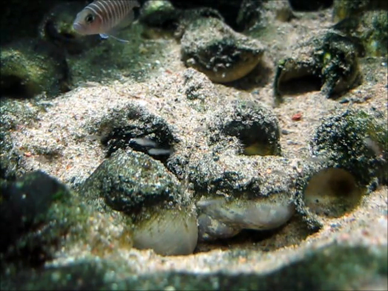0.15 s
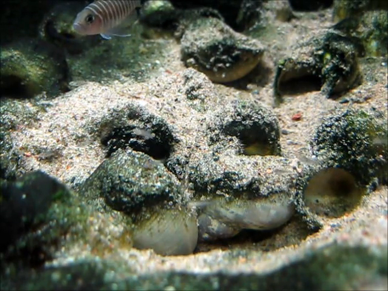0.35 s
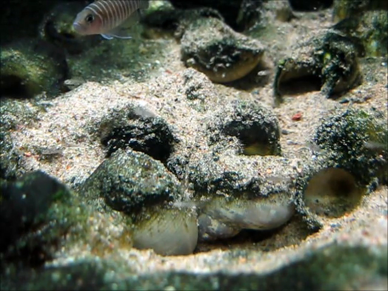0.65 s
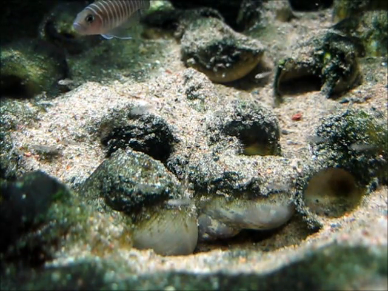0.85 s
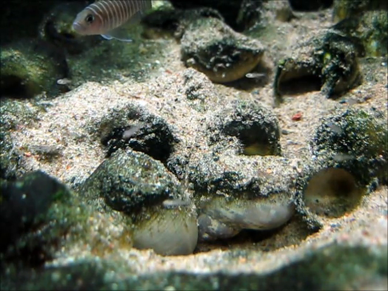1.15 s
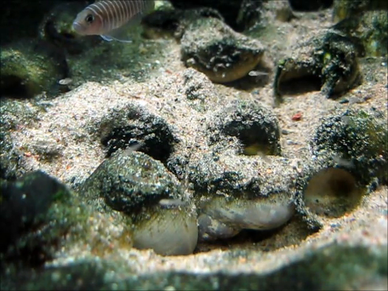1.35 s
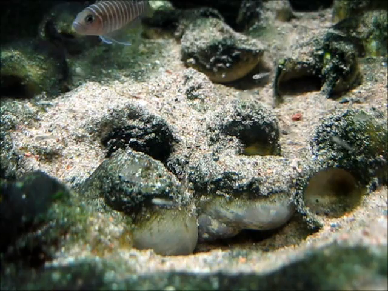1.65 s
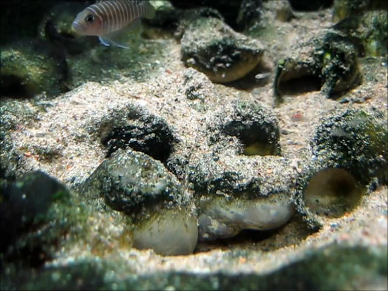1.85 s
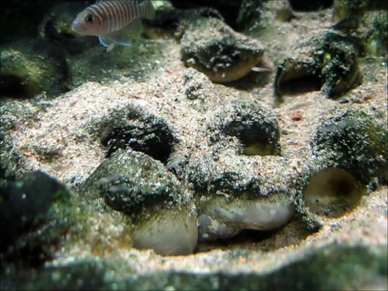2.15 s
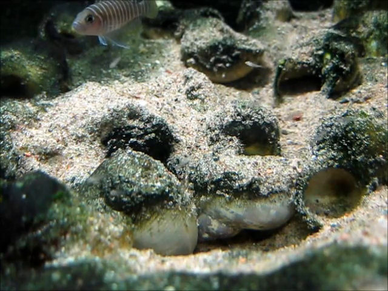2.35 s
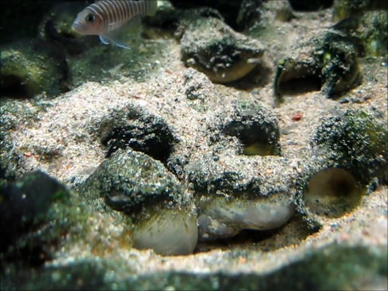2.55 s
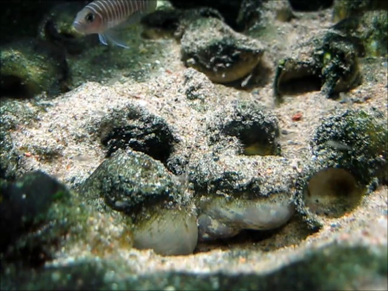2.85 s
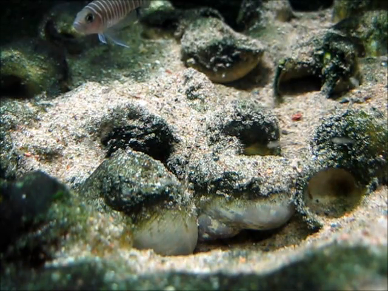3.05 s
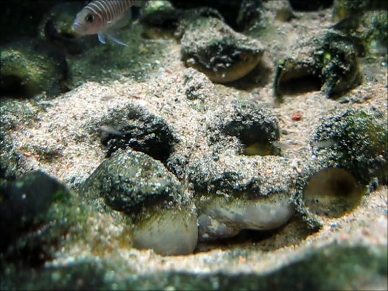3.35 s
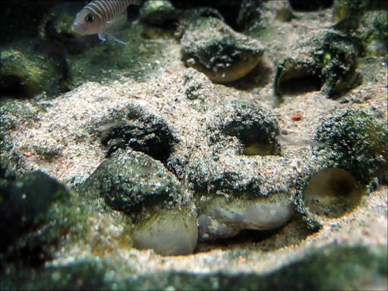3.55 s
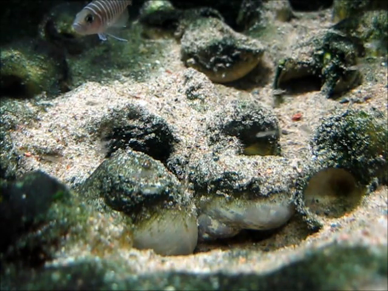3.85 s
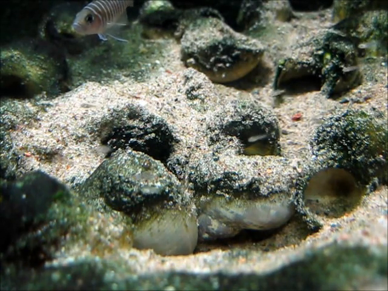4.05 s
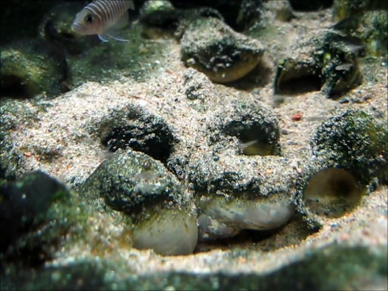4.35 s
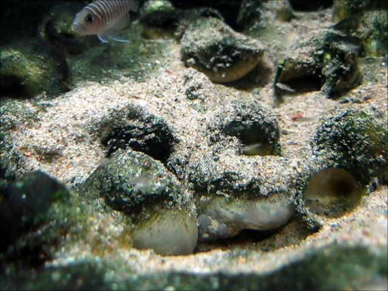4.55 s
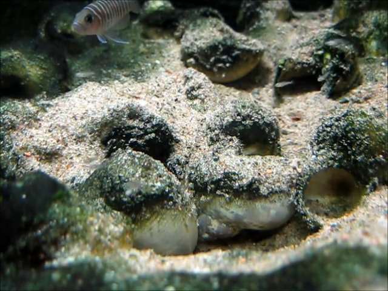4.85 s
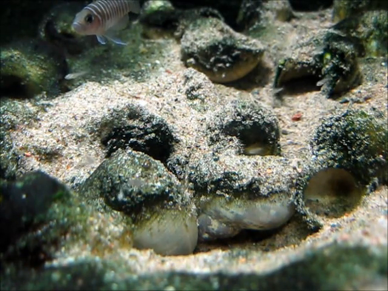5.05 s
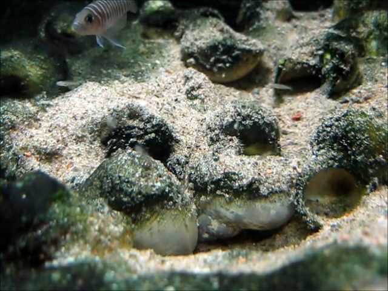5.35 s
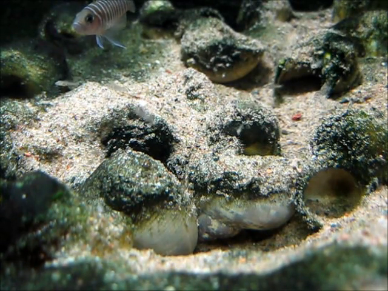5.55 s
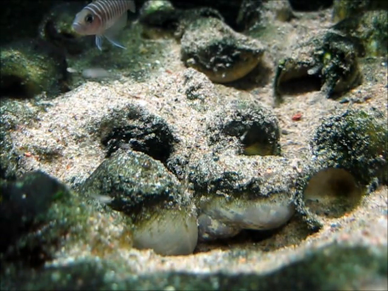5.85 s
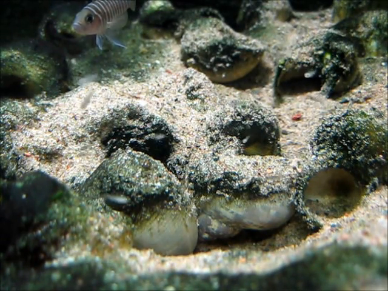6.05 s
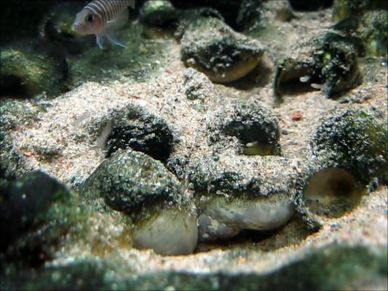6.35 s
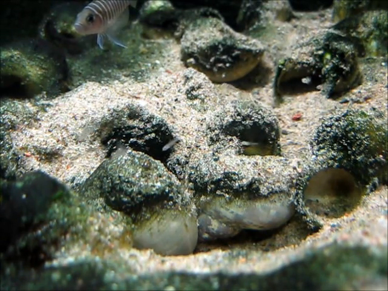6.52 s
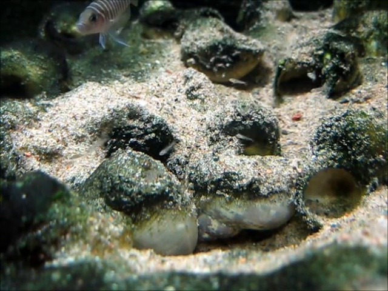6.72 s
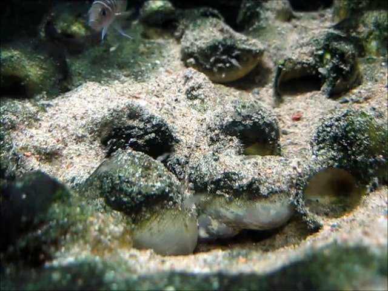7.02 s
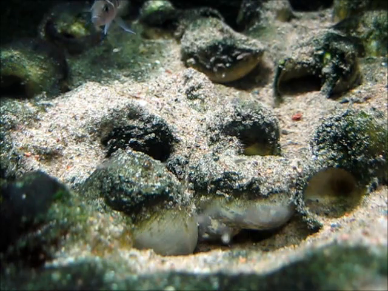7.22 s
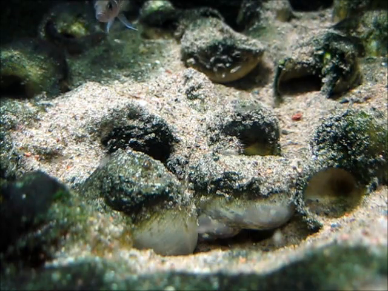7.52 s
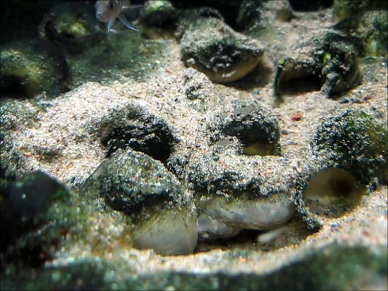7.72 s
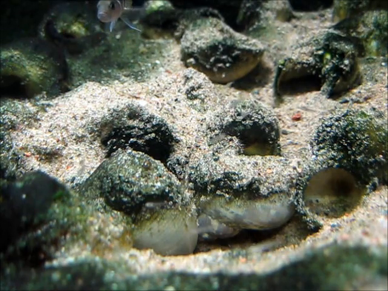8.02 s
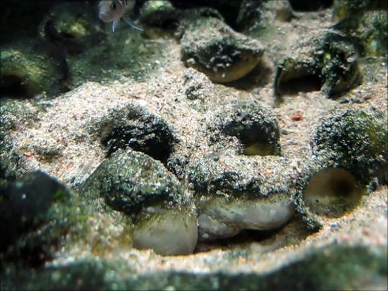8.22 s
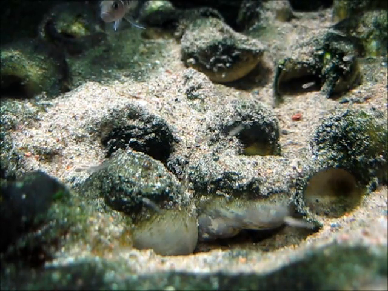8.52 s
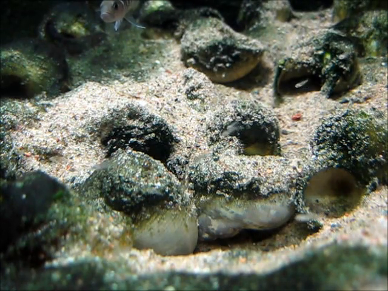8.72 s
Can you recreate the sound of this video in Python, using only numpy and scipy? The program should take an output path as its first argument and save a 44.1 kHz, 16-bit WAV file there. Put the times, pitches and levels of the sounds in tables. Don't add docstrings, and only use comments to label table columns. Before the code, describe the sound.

Close outside a glass fish tank, a small pump hums low and steadily, its loose rotor buzzing against the housing with fine metallic ticking. Water gurgles continuously through a filter box and rumbles in the cabinet. Tiny bright bubbles pop at irregular moments, duller ones bloop under the lid, and occasional hard knocks thud. A small microphone adds soft hiss; the fish themselves are silent.

```python
import sys
import numpy as np
from scipy import signal
from scipy.fft import rfft, irfft, next_fast_len
from scipy.io import wavfile
from scipy.ndimage import map_coordinates

SR = 44100
rng = np.random.default_rng(int(sys.argv[2]) if len(sys.argv) > 2 else 0)


def ratio(d):
    e = np.asarray(d, float) / 20
    return 10 ** e


def unload_audio(sound):
    columns = np.transpose(np.atleast_2d(sound))
    steps = np.round(np.clip(columns, -1, 1) * 32767)
    wavfile.write(sys.argv[1], SR, steps.astype(np.int16))


N = 391608

# (multiple of the mains [count], level [dB])
HUM_TONES = [(1, -51), (2, -33), (3, -53.5), (4, -66), (5, -58), (6, -56), (7, -52.5), (8, -54), (9, -57.5),
             (10, -51), (11, -82), (12, -66), (13, -53.5), (14, -56), (15, -93), (16, -59), (17, -53.5)]
# (pitch [Hz], width [Hz], level [dB])
HOUSING_MODES = [(390, 173, -7.5), (990.6, 65, 3.5), (1085, 65, 1), (2050, 200, -23.5), (2230, 18, -16.5),
                 (2790, 43, -22.5), (3110, 180, -28.5), (1506, 77, -19), (1654, 30, -21), (2450, 39, -24.5)]
# (pitch [Hz], width [Hz], level [dB])
LID_MODES = [(634, 162, -3.5), (842, 176, -9.5)]
# (pitch [Hz], width [Hz], level [dB])
SHAFT_MODES = [(6400, 220, 4.5), (7740, 160, 4.5), (8200, 200, 4), (8940, 190, 7), (9400, 240, -12),
               (10500, 360, 2.5), (8900, 4800, -0.5), (4800, 1500, -27)]
# (time [s], peak level [dB])
THUDS = [(0.099, -26), (0.332, -28), (0.716, -24), (1.266, -26), (1.559, -28), (1.616, -28), (3.932, -25),
         (4.015, -27), (4.149, -28), (5.216, -27), (5.388, -26), (5.449, -26), (5.699, -28), (6.433, -27),
         (7.984, -26), (8.288, -26), (8.683, -25), (8.787, -25)]
# (pitch [Hz], width [Hz], level [dB])
BOX_MODES = [(591, 48, -3), (613.7, 32, 1), (668.4, 53.4, 0), (719, 52, -8), (804, 91, -8.5),
             (1227, 46, -16), (1560, 750, -32)]
# (pitch [Hz], width [Hz], level [dB])
CABINET_MODES = [(30.7, 22, -10), (85.3, 12.2, 3.5), (109.5, 32.6, -1), (150.8, 15.6, -0.5),
                 (199, 31, -6.5), (240.5, 4.3, 0.5), (277.6, 46, -4.5), (319, 64, -14.5), (424.1, 6.1, -7),
                 (457.5, 94, -11.5)]
# (time [s], peak level [dB], pitch [Hz])
POPS = [(0.2194, -50, 8230), (0.3681, -50, 6290), (0.4828, -49, 6690), (0.6448, -41, 6740),
        (0.7317, -54, 8950), (1.068, -46, 8940), (1.2526, -45, 10500), (1.7539, -49, 10700),
        (1.7863, -42, 10500), (1.8262, -46, 10500), (1.8696, -51, 10600), (1.9854, -54, 10500),
        (2.4688, -54, 6110), (2.9751, -51, 10500), (3.0864, -44, 6670), (3.8177, -52, 8940),
        (3.8586, -46, 8250), (4.0158, -48, 9490), (4.153, -40, 10500), (4.5024, -42, 10500),
        (4.7027, -41, 10500), (4.8688, -46, 6920), (5.5653, -48, 9470), (5.6486, -47, 10500),
        (6.55, -47, 6340), (6.9536, -42, 6670), (7.2195, -47, 8940), (7.5368, -41, 10500),
        (7.9613, -43, 10500), (8.1207, -40.5, 8940)]
# (time [s], peak level [dB], pitch [Hz])
PLOPS = [(0.0672, -58, 5530), (0.378, -53, 5280), (0.3995, -57, 3500), (1.035, -56, 3630),
         (1.8517, -55, 5200), (2.1705, -47, 4830), (2.2533, -57, 5430), (2.397, -55, 3670),
         (2.6424, -50, 4830), (2.65, -50, 5900), (3.1028, -48, 5260), (3.4161, -58, 4500),
         (3.4989, -57, 4080), (3.5558, -55, 5320), (4.4822, -59, 3750), (4.6813, -60, 4490),
         (4.7421, -46, 5280), (5.1208, -44, 3870), (6.4847, -57, 3540), (6.8608, -51, 5260),
         (6.8887, -58, 3850), (6.9331, -57, 3630), (7.3168, -55, 4110), (7.7433, -57, 3600),
         (8.7535, -55, 4510)]
# (time [s], peak level [dB], pitch [Hz])
BLOOPS = [(0.0258, -48, 2230), (0.0692, -50, 2230), (0.4658, -44, 1840), (0.603, -51, 1730),
          (1.036, -48, 1990), (1.265, -48, 2090), (1.7035, -45, 1960), (1.9989, -44, 2020),
          (2.3655, -44, 1580), (3.0824, -48, 1730), (3.3039, -45, 1670), (3.3493, -43, 2000),
          (3.8816, -52, 1830), (3.9365, -56, 2260), (4.1709, -42, 2050), (4.5825, -46, 1870),
          (5.434, -54, 2040), (6.0332, -53, 1680), (6.0831, -46, 1990), (6.4662, -53, 1850),
          (6.5321, -48, 2080), (6.7321, -53, 2030), (7.002, -45, 1660), (7.5203, -46, 1930),
          (7.7653, -43, 1860), (7.9828, -43, 2020), (8.2881, -43, 1700), (8.333, -46, 2230),
          (8.4203, -46, 2190), (8.7495, -52, 1680)]
SHAKEN_PITCHES = [6250, 6380, 6900, 7900, 8100, 8640, 9460, 10500]
# (frequency [Hz], level [dB per Hz])
HISS_CURVE = [(760, -39), (1300, 3), (1400, -12.5), (2150, -14), (2600, -24.5), (2800, -20.5),
              (8080, -20.5), (16000, -23)]

MAINS_HZ = 59.996
KNOCK_S, REBOUND_S = -.0008, .0050
KNOCK_DB, TICK_DB, GURGLE_DB = -44.5, -69.5, -39
KNOCK_SCATTER_DB, TICK_SWELL_DB, LUMP_DB = 1.5, 1.1, 1.2
THUD_HOUSING_DB, THUD_LID_DB = 8.5, 6
SURGE_DB, SURGE_RATE = 0.98, 3
SHAKEN_SHARE = 0.26
SHAKEN_DB, SHAKEN_SPREAD_DB = -56.5, 3
CLICK_DB, PURER = -12, 2.1
SPRAY_DB, SPRAY_S, SPRAY_OCT = -2, .009, .2
PLOP_CYCLES, PLOP_DB, BLOOP_DB = 2.1, 3.5, 1
TOP_HZ = 15730


def unit(x):
    return x / np.sqrt(np.mean(np.abs(x) ** 2) + 1e-20)


def noise():
    return rng.standard_normal(N)


def wobble(rate):
    points = rng.standard_normal(N // 100)
    return map_coordinates(points, [np.arange(N) * rate / SR])


def filtered(x, response):
    m = next_fast_len(N + SR // 2)
    return irfft(rfft(x, m) * response(np.fft.rfftfreq(m, 1 / SR)), m)[..., :N]


def resonant(x, modes, steep):
    f = np.fft.rfftfreq(2 ** 15, 1 / SR)
    response = 0
    for k, (hz, width, db) in enumerate(modes):
        mode = 1j * f * width / (hz * hz - f * f + 1j * f * width) + 1e-9
        response = response + (-1) ** k * ratio(db) * mode ** steep
    ring = irfft(unit(response))
    return signal.fftconvolve(x, ring[:len(f)])[:N]


def impulses(s, db):
    place = np.round(np.clip(s, 0, None) * SR).astype(int)
    return np.bincount(place, ratio(db), N)[:N]


def hum():
    turn = 2 * np.pi * MAINS_HZ
    out, t = np.zeros(N), np.arange(N) / SR
    drift = [ratio(.4 * wobble(5)), ratio(1.2 * wobble(4)), ratio(1.2 * wobble(6))]
    for k, db in HUM_TONES:
        pull = (-1) ** k * np.exp(-1j * k * turn * .0045)
        rebound = .9 * (k < 13) * np.exp(-1j * k * turn * REBOUND_S)
        strike = np.exp(-1j * k * turn * .0004) + rebound
        phase = np.angle(pull if k < 3 else strike)
        out += ratio(db) * drift[(k + 1) % 3] * np.cos(k * turn * t + phase)
    return np.sqrt(2) * out


def knocks(delay_s, jitter_s, scatter_db):
    draw = rng.standard_normal((int(N / SR * MAINS_HZ) + 1, 2))
    s = KNOCK_S + delay_s + np.arange(len(draw)) / MAINS_HZ + jitter_s * draw[:, 0]
    return unit(impulses(s, scatter_db * draw[:, 1]))


def scrapes(scatter_db, decay_s, second_db):
    cycle = (np.arange(N) / SR - KNOCK_S) * MAINS_HZ + 1
    size = ratio(scatter_db * rng.standard_normal((int(cycle[-1]) + 2, 2)))

    def burst(c, k):
        return size[c.astype(int), k] * np.exp(-(c % 1) / MAINS_HZ / decay_s)

    return (burst(cycle, 0) + ratio(second_db) * burst(cycle - .27, 1)) * noise()


def rotor(knock_db, tick_db, small):
    blow = knocks(delay_s=-.0004, jitter_s=.0005, scatter_db=KNOCK_SCATTER_DB)
    rebound = ratio(-9.5) * knocks(delay_s=0.003445, jitter_s=0.000808, scatter_db=2.5)
    rattle = blow + rebound + ratio(-1.5 + 2.2 * wobble(40)) * noise()
    s, db = np.transpose(THUDS)
    housing_push = ratio(knock_db - 4.0) * rattle + impulses(s, db + THUD_HOUSING_DB)
    lid_push = ratio(knock_db - 4.5) * (blow - 2 * rebound) + impulses(s, db + THUD_LID_DB)
    housing = resonant(housing_push, HOUSING_MODES, steep=1.15)
    lid = resonant(lid_push, LID_MODES, steep=1.9)

    tick = unit(scrapes(scatter_db=5.5, decay_s=0.0011, second_db=-3))
    s, db, _, click_db = small
    click_shape = np.hanning(150) ** 2
    clicks = np.convolve(impulses(s, db + .5 * click_db - 0.5), click_shape)[:N] * noise()
    return housing + lid + resonant(ratio(tick_db - 4.5) * tick + clicks, SHAFT_MODES, steep=2.0)


def water(gurgle_db):
    lumps = ratio(LUMP_DB * wobble(70)) * noise()
    box = resonant(ratio(gurgle_db - 3.0) * lumps, BOX_MODES, steep=1.477)
    return box + resonant(ratio(-41.5) * noise(), CABINET_MODES, steep=1.14)


def small_bubbles():
    draw = rng.random((int(N / SR * MAINS_HZ), 5))
    s = KNOCK_S - .0015 + np.arange(len(draw)) / MAINS_HZ + .003 * draw[:, 0] ** 3
    hole = (len(SHAKEN_PITCHES) * draw[:, 1]).astype(int)
    hz = np.take(SHAKEN_PITCHES, hole) * (1 + 0.045 * (draw[:, 2] - .5))
    db = SHAKEN_DB + SHAKEN_SPREAD_DB * draw[:, 3]
    shaken = np.c_[np.abs(s), db, hz][draw[:, 4] < SHAKEN_SHARE]
    s, db, hz = np.vstack([POPS, shaken]).T
    return s, db, hz, CLICK_DB - PURER * (db + 54.5)


def bubbles(rows, cycles, rise, count):
    out, t = np.zeros(N + count), np.arange(count) / SR
    for s, db, hz in rows:
        turns = hz * t
        shape = np.exp(-turns / cycles) * (1 - np.exp(-2.2 * turns / cycles)) ** 2 * 1.6
        tone = np.sin(2 * np.pi * turns * (1 + rise * turns / cycles))
        out[round(s * SR):][:count] += ratio(db) * shape * tone
    return out[:N]


def surface(small):
    draw = rng.random((500, 3))
    faint = np.c_[draw[:, 0] * N / SR, -64 + 9 * draw[:, 1], 4000 * 3.4 ** draw[:, 2]]
    s, db, hz, _ = small
    clear = bubbles(np.c_[s, db - 4, hz], cycles=12, rise=0.0032, count=900)

    s, db, hz = np.repeat(POPS, repeats=3, axis=0).T
    draw = rng.random((len(s), 3))
    spray_hz = hz ** .7 * 8300 ** .3 * 2 ** (SPRAY_OCT * (2 * draw[:, 2] - 1))
    spray = np.c_[s + SPRAY_S * draw[:, 0], db + SPRAY_DB - 6 * draw[:, 1], spray_hz]

    plops = ratio(PLOP_DB) * bubbles(PLOPS, cycles=PLOP_CYCLES, rise=0.01, count=500)
    bloops = ratio(BLOOP_DB) * bubbles(BLOOPS, cycles=3.9, rise=0.015, count=900)
    mist = bubbles(spray, cycles=4.6, rise=.005, count=500)
    return clear + mist + plops + bloops + bubbles(faint, cycles=5.3, rise=0.0044, count=500)


def scene():
    surge_db = SURGE_DB * wobble(SURGE_RATE)
    small = small_bubbles()
    tick_db = TICK_DB + TICK_SWELL_DB * wobble(2.38)
    pump = hum() + rotor(KNOCK_DB + .5 * surge_db, tick_db, small)
    return (pump + water(GURGLE_DB + surge_db) + surface(small))[None]


def roll_off(x):
    return signal.sosfilt(signal.butter(12, 16720, fs=SR, output="sos"), x)


def record(dry):
    f, db = np.transpose(HISS_CURVE)
    hiss = filtered(noise(), lambda hz: ratio(np.interp(np.log(hz + 1), np.log(f), db)))
    mix = filtered(dry + ratio(-59.5) * unit(hiss), lambda hz: hz < TOP_HZ)
    return roll_off(mix)


dry = scene()
out = record(dry)
unload_audio(out)
```